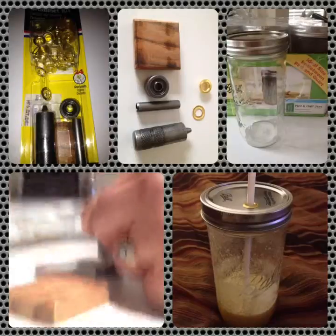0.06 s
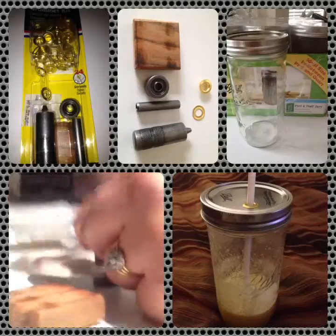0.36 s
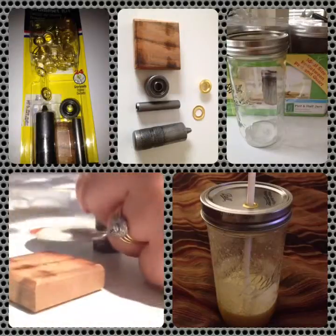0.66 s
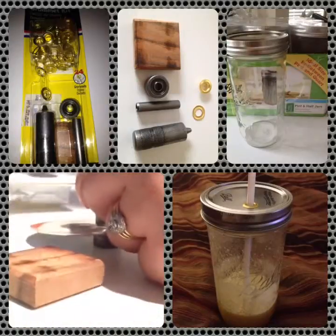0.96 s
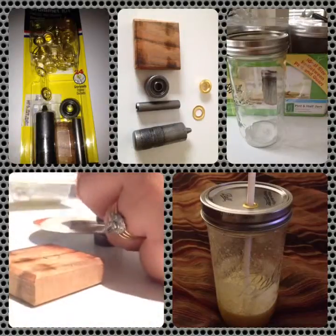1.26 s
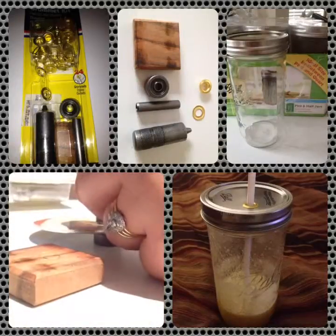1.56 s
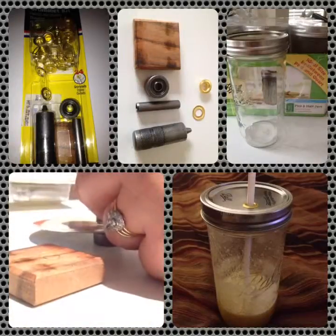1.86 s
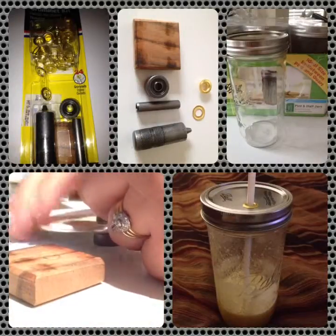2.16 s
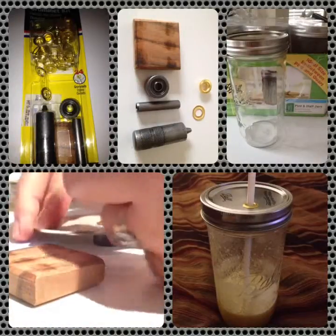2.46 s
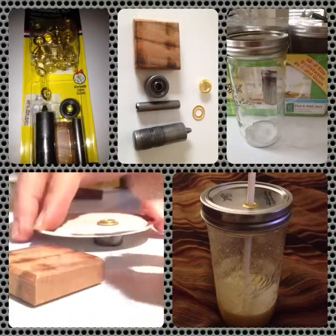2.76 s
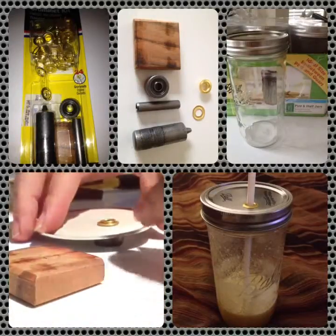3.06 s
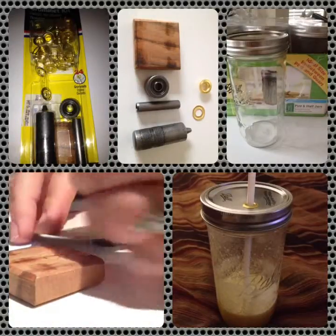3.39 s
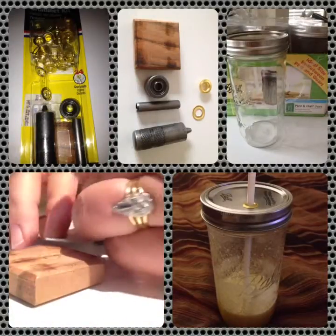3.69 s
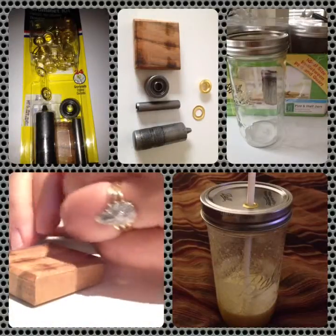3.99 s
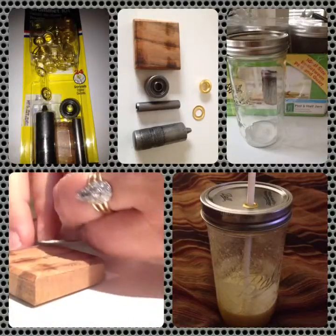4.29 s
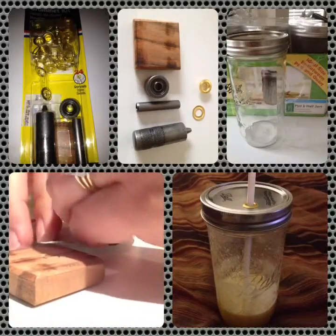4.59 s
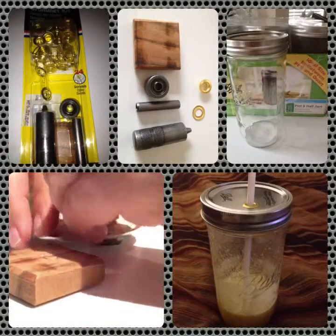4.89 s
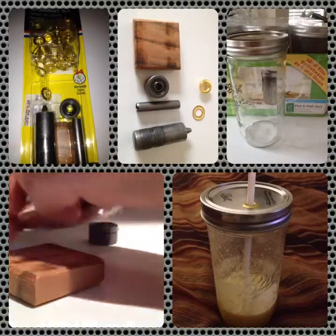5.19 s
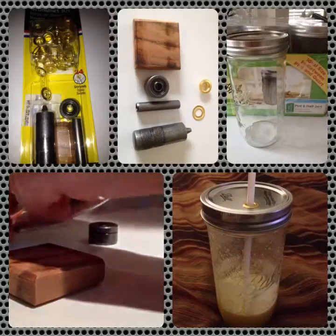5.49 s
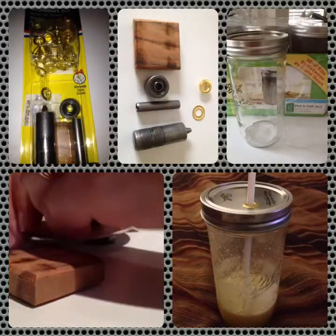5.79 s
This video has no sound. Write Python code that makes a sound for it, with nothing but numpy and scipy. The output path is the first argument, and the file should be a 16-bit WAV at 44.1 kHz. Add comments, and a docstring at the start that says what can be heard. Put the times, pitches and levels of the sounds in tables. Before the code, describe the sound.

Two sharp hammer blows ring on a steel punch, followed by a clatter on the table and light tin lid clinks.

```python
"""A table top in a small, live room, the recorder standing close by: a grommet is hammered into a jar lid.
One blow has just fallen and a second follows. After each, loose tools hop, the recorder rocks twice
on its feet and the lid rebounds; the gain control ducks the room noise, then lets it swell back.
The steel punch is put down, the tin lid is slid and lifted off, and the little anvil knocks and bounces."""
import sys
import numpy as np
from scipy import signal
from scipy.fft import rfft, irfft, next_fast_len
from scipy.io import wavfile
from scipy.ndimage import uniform_filter1d

SR = 44100
rng = np.random.default_rng(int(sys.argv[2]) if len(sys.argv) > 2 else 0)


def store_wav(level_fs):
    """Save 16-bit WAV to argv[1]."""
    pcm = np.round(np.clip(np.atleast_2d(level_fs), -1, 1) * 32767)
    wavfile.write(sys.argv[1], SR, pcm.T.astype(np.int16))


N = 261954
LEAD = SR // 5  # samples before time zero, where the first blow falls
TIME = np.arange(-LEAD, N) / SR
AGE = np.arange(SR // 2) / SR  # seconds since a contact

# hammer blows on the punch: start_s, level_db
BLOWS = [(-0.166, -2.5), (0.317, 3.5)]
# modes of the free tin lid: pitch_hz, level_db, t60_s
FREE_LID_MODES = [(1180, -18, .08), (2330, -16, .07), (2510, -14, .07), (4030, -11, .05), (4280, -14, .08),
                  (6400, -15, .12), (9200, -17, .06), (10600, -26, .06), (12300, -25, .06)]


def amp(db):
    """Decibels to gain."""
    return 10 ** (np.asarray(db) / 20)


def dying(t60, age=AGE):
    """An envelope that falls 60 dB in t60 seconds."""
    return np.exp(-np.log(1000) * age / t60)


def cut(x, hz, kind="low", order=2):
    """Butterworth low-, high- or band-pass."""
    sos = signal.butter(order, np.clip(hz, 10, .45 * SR), kind, fs=SR, output="sos")
    return signal.sosfilt(sos, x + 1e-18)


def noise(spectrum, size):
    """Noise of a given colour, rms 1."""
    hz, db = np.transpose(spectrum)
    padded = next_fast_len(size)
    log_hz = np.log(np.fft.rfftfreq(padded, 1 / SR) + 1)
    colour = amp(np.interp(log_hz, np.log(hz), db))
    x = irfft(rfft(rng.standard_normal(padded)) * colour, padded)[:size]
    return x / x.std()


def add(track, s, sound):
    """Lay a sound on the track at time s."""
    part = track[max(LEAD + round(s * SR), 0):][:len(sound)]
    part += sound[:len(part)]


def ring(modes, scatter_db, detune=0.0):
    """A struck body: each contact point stirs the modes differently, and the grip shifts their pitch."""
    out = np.zeros(len(AGE))
    for k, (hz, db, t60) in enumerate(modes):
        stir, shift = rng.standard_normal(2)
        tone = np.sin(2 * np.pi * hz * (1 + detune * shift) * AGE)
        out += (-1) ** k * amp(db + scatter_db * stir) * tone * dying(t60)
    return out


def crack(spectrum, t60):
    """A crowd of close, short-lived modes that die together."""
    return noise(spectrum, len(AGE)) * dying(t60)


def bounces(s, db, loss_db, count=3, first_flight_s=0.012, shrink=0.6):
    """The touches of a bouncing piece, each sooner and weaker than the last: start_s, level_db."""
    for k in range(count):
        yield s, db - k * loss_db
        s += first_flight_s * shrink ** k


def room_noise(level_db=-53):
    """The room's steady background, a low rush with a faint hiss."""
    # colour of the background: freq_hz, density_db
    spectrum = [(24, -82.5), (40, -23), (96, -23), (129, -6.5), (207, -0.5), (241, -2.5), (427, -6.5),
                (461, -5.5), (838, -11), (2010, -27.5), (2450, -26.5), (6010, -31.5), (8110, -26),
                (10700, -39), (15500, -33)]
    return amp(level_db) * cut(noise(spectrum, len(TIME)), 70, "high")


def room_echo(x, build_s=0.0085):
    """The small room's diffuse echo builds up and dies band by band."""
    # bands of the echo: centre_hz, level_db, t60_s
    bands = [(60, -10.5, 0.71), (154, -4, 0.57), (298.1, 0, 0.59), (620, -2, 0.48), (1210, -5.5, 0.55),
             (2380, -2, 0.64), (4930, -1.5, 0.46), (7993, 0.5, 0.47), (11000, 10.5, 0.14),
             (16100, 0.5, 0.12)]
    age = np.arange(SR) / SR
    log_hz = np.log(np.fft.rfftfreq(SR, 1 / SR) + 1)
    log_centres = np.log([hz for hz, _, _ in bands])
    white = rfft(rng.standard_normal(SR))
    tail = np.zeros(SR)
    for (_, db, t60), weights in zip(bands, np.eye(len(bands))):
        band = irfft(white * np.interp(log_hz, log_centres, weights))
        tail += amp(db) * band * dying(t60, age)
    tail *= 1 - np.exp(-age / build_s)
    return signal.fftconvolve(x, tail / np.linalg.norm(tail))[:len(x)]


def near_echoes(x):
    """The direct sound with its first reflections from things on the table and the wall behind."""
    # reflections off close surfaces: delay_s, level_db
    reflections = [(.0047, -13), (.0074, -9), (.0102, -16), (.0165, -18), (.0215, -20)]
    return x + sum(amp(db) * np.interp(TIME - delay, TIME, x) for delay, db in reflections)


def recorder_jolts(growth=1.7):
    """Soft thumps through the recorder's feet and ticks of its case, too close to have any echo."""
    # modes of the case: pitch_hz, level_db, t60_s
    case_modes = [(165, -11, .07), (225, -4, .05), (330, -3, .03), (440, -6, .025), (950, -15, .015),
                  (1700, -19, .01)]
    # colour of a case tick: freq_hz, density_db
    tick_spectrum = [(500, -23.5), (3000, -1.5), (4200, -1.5), (7500, 3), (9000, -11.5), (12000, -13),
                     (14000, -23.5)]
    # rocking after each blow: delay_s, thump_db, tick_lag_s, tick_db
    rocks = [(0.083, 3, 0.0013, -0.5), (0.2806, -6, 0.0058, -15.5)]
    # soft bumps as the recorder settles: start_s, level_db
    bumps = [(1.665, -21), (1.677, -19), (1.730, -25.5)]
    # lone ticks of the case: start_s, level_db
    faint_ticks = [(0.898, -42.5), (0.923, -45)]
    out = np.zeros(len(TIME))
    thumps, ticks = [], []
    for s, db in BLOWS:
        rock_db = growth * db  # a harder blow rocks it far more
        for delay, thump_db, lag, tick_db in rocks:
            thumps.append((s + delay, rock_db + thump_db))
            ticks.append((s + delay + lag, rock_db + tick_db))
    for s, db in thumps + list(bumps):
        add(out, s, amp(db) * cut(ring(case_modes, scatter_db=1.0), 3500))
    for s, db in ticks + list(faint_ticks):
        add(out, s, amp(db) * crack(tick_spectrum, t60=.005))
    return out


def lid_slides(slips_per_s=1500, swell_db_per_s=57):
    """Tiny slips of metal on metal rasp and keep the lid ringing; the fingers press harder as they push."""
    # the lid slides over the anvil: start_s, length_s, level_db
    slides = [(1.107, 0.039, -45.5), (2.320, 0.053, -47), (3.934, 0.029, -59), (4.362, 0.062, -50),
              (4.779, 0.021, -61.5)]
    # colour of one slip: freq_hz, density_db
    slip_spectrum = [(20, -59), (300, 1), (1300, 4.5), (2500, -3), (4000, -6.5), (6000, -5.5), (8300, -12),
                     (10000, -78), (15000, -27)]
    out = np.zeros(len(TIME))
    for start, length, db in slides:
        slips = (rng.random(len(AGE)) < slips_per_s / SR) * rng.standard_normal(len(AGE))
        pressure = amp(db + swell_db_per_s * AGE) * (AGE < length)
        tin = ring(FREE_LID_MODES, scatter_db=2.0, detune=.01) * dying(.04)
        tin += amp(3) * crack(slip_spectrum, t60=.02)
        add(out, start, signal.fftconvolve(slips / slips.std() * pressure, tin / np.linalg.norm(tin)))
    return out


def lid_strikes(bright_hz=6500, nick_db=-21, rebound_s=0.247, rebound_db=-27, rebound_t60_s=0.12):
    """Held, the tin gives a low ping; free, its edge nicks the anvil and it clinks until fingers stop it."""
    # taps on the held lid: start_s, level_db
    taps = [(1.2318, -14), (1.3564, -24)]
    # modes of the held lid: pitch_hz, level_db, t60_s
    held_modes = [(810, -25, .12), (1180, -17, .04), (1400, -2, .022), (1490, -24, .18), (1610, -25, .18),
                  (1760, -19, .04), (2800, -20, .025), (3750, -22, .04)]
    # the free lid clinks on the anvil: start_s, level_db, damping_t60_s
    clinks = [(0.8, -45, 0.26), (2.198, -37.5, 0.04), (2.269, -34.5, 0.066), (3.17, -53.5, 0.11),
              (4.257, -26.5, 0.17), (4.342, -29.5, 0.14), (4.356, -32, 0.25), (4.415, -35, 0.12),
              (4.9403, -31, 0.028), (5.7742, -20.5, 0.014), (5.7871, -23.5, 0.026)]
    # colour of the tin's crack: freq_hz, density_db
    tin_spectrum = [(20, -42.5), (200, -0.5), (900, 4), (2500, -2), (4200, -2), (8000, -5), (10000, -9.5),
                    (15000, -10.5)]
    # colour of the sharp edge's nick: freq_hz, density_db
    nick_spectrum = [(200, -45), (3000, -13), (8000, -12.5), (11500, -14), (14000, -3.5), (15500, -0.5)]
    out = np.zeros(len(TIME))
    for s, db in taps:
        tin = ring(held_modes, scatter_db=1.0, detune=.01)
        tin += amp(-17) * cut(crack(tin_spectrum, t60=.045), 7000)
        add(out, s, amp(db) * tin)
    # after each blow the lid drops back on the anvil
    rebounds = [(s + rebound_s, db + rebound_db, rebound_t60_s) for s, db in BLOWS]
    for s, db, damping_t60 in rebounds + list(clinks):
        tin = ring(FREE_LID_MODES, scatter_db=2.0, detune=.006)
        tin += amp(-5) * crack(tin_spectrum, t60=.035)
        nick = amp(nick_db) * crack(nick_spectrum, t60=0.043)
        add(out, s, amp(db) * (cut(tin, bright_hz) * dying(damping_t60) + nick))
    return out


def tool_knocks(push_db=10.5, click_db=-23.5, click_hz=(2500, 8300), hop_bright_hz=684, hop_loss_db=6):
    """Steel clicks and the table top gives way with one push, then rings; longer contact dulls the knock."""
    # two loose tools hop at every blow: flight_s, level_re_blow_db
    tool_hops = [(0.008, 4.5), (0.0391, 4.5)]
    # a steel tool meets the table: start_s, level_db, brightness_hz, loss_per_bounce_db
    knocks = [(1.4275, -2, 1040, 12), (1.4852, -0.5, 844, 17), (1.5020, -8.5, 900, 18),
              (1.5085, 0, 886, 14), (1.5265, -3, 860, 18), (2.1985, -29.5, 615, 17),
              (4.3690, -22.5, 1500, 8.5), (4.4114, -18.5, 1026, 10.5), (4.9742, -30.5, 2240, 14),
              (4.9867, -22.5, 1930, 4.5), (5.0385, -30.5, 1500, 18), (5.7480, -13.5, 1940, 27),
              (5.7747, -19.5, 1670, 10)]
    # modes of the table top: pitch_hz, level_db, t60_s
    table_modes = [(130, -25, .06), (220, -19, .06), (320, -13, .06), (480, -11, .045), (570, -8, .04),
                   (690, -8, .035), (780, -5, .036), (890, -6, .025), (1030, -8, .022), (1190, -9, .035),
                   (1620, -13, .025)]
    # colour of a knock's crack: freq_hz, density_db
    knock_spectrum = [(20, -14), (70, -7.5), (150, -3.5), (300, 1.5), (410, -7.5), (520, 7), (850, 10.5),
                      (1300, 2), (2000, 1), (3200, -2.5), (4500, -5.5), (8000, -7.5), (10000, -20),
                      (15000, -13)]
    # the punch sings faintly as it is put down: start_s, level_db
    punch_drops = [(1.5080, -44)]
    # modes of the loose punch: pitch_hz, level_db, t60_s
    loose_punch_modes = [(6700, -2, .12), (7170, 0, .26), (7700, -4, .1), (8300, -4, .08)]
    out = np.zeros(len(TIME))
    push = amp(push_db) * dying(.0011)
    hops = [(s + flight, db + hop_db, hop_bright_hz, hop_loss_db)
            for s, db in BLOWS for flight, hop_db in tool_hops]
    for start, first_db, bright_hz, loss_db in hops + list(knocks):
        for s, db in bounces(start, first_db, loss_db):
            body = ring(table_modes, scatter_db=1.5, detune=.04)
            body += amp(-1) * crack(knock_spectrum, t60=.04)
            wood = cut(push, bright_hz) + cut(body, bright_hz, order=3)
            wood = cut(wood, 0.27 * bright_hz, "high")  # light, bright pieces stir no bass
            click = amp(click_db) * cut(crack(knock_spectrum, t60=.03), click_hz, "band", order=3)
            add(out, s, amp(db) * (wood + click))
    for s, db in punch_drops:
        add(out, s, amp(db) * ring(loose_punch_modes, scatter_db=2.0))
    return out


def hammer():
    """Steel on steel: a sharp crack, then punch and table ring on while the loose tools shiver."""
    # modes of the punch standing on the table: pitch_hz, level_db, t60_s
    punch_modes = [(110, -11, .1), (158, -7, .16), (215, -13, .3), (415, -8, .18), (460, -3, .08),
                   (715, -16, .2), (820, -18, .2), (935, -18, .2), (1500, -2, .04), (1620, -2, .03),
                   (1930, -4, .035), (2234, -7, .035), (2600, -2, .018), (2850, -4, .016), (4312, -25, .3),
                   (5477, -22, .12), (6029, -19, .38), (6670, -28, .3), (7531, -29, .35), (8651, -27, .22),
                   (9050, -27, .25)]
    # colour of a blow's crack: freq_hz, density_db
    blow_spectrum = [(30, -14), (80, -4), (170, 1.5), (450, 3.5), (1000, 4.5), (1700, -3.5), (2700, -9.5),
                     (3400, -7), (4300, -5), (8300, -10.5), (10200, -26.5), (15000, -18)]
    out = np.zeros(len(TIME))
    for s, db in BLOWS:
        impact = amp(1.0) * cut(crack(blow_spectrum, t60=0.021), 1200, "high")
        shiver = amp(-8) * crack(blow_spectrum, t60=0.46)
        add(out, s, amp(db) * (impact + shiver + ring(punch_modes, scatter_db=1.0)))
    return out


def scene():
    """All sounds at one close microphone, which is weak in the bass; the hammer fills the room most."""
    blows = hammer()
    knocks = tool_knocks()
    lid = lid_strikes() + lid_slides()
    echo = room_echo(amp(-6.5) * blows + amp(-10.5) * knocks + amp(-13.5) * lid)
    close = near_echoes(blows + knocks + lid) + recorder_jolts()
    sounds = cut(close + echo, 55, "high")
    return (sounds + room_noise())[None, LEAD:]


def record(dry, threshold_db=-13, range_db=11.5, release_db_per_s=9.0, attack_s=0.0039, held_db=3.0):
    """Gain control starts turned down, ducks fast and recovers slowly; peaks overload; the top is cut."""
    power = uniform_filter1d(dry[0] ** 2, size=256)
    level_db = 10 * np.log10(np.maximum(power, 1e-12))
    excess_db = np.clip(level_db - threshold_db, 0, range_db)
    recovery_db = release_db_per_s * TIME[LEAD:]
    duck_db = np.maximum.accumulate(np.maximum(excess_db + recovery_db, held_db)) - recovery_db
    pole = np.exp(-1 / (attack_s * SR))
    duck_db = held_db + signal.lfilter([1 - pole], [1, -pole], duck_db - held_db)
    clipped = np.clip(dry * amp(-duck_db), -.85, .85)
    top_cut = signal.ellip(10, .1, 80, 15400, fs=SR, output="sos")
    return signal.sosfilt(top_cut, clipped)


dry = scene()
out = record(dry)
store_wav(out)
```